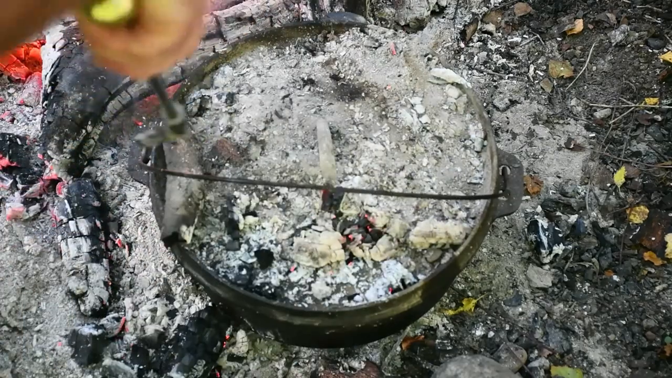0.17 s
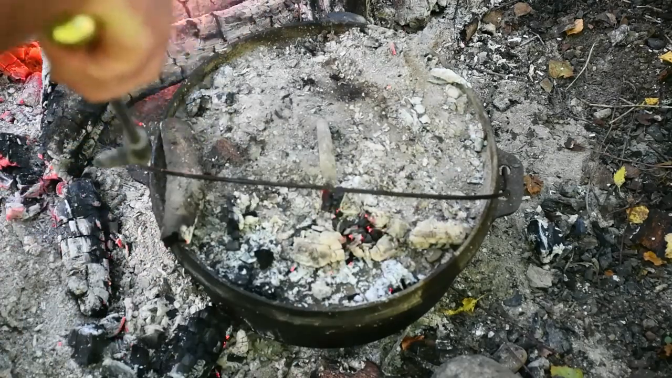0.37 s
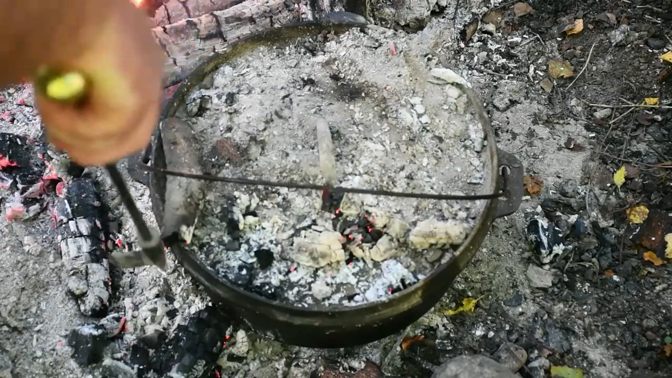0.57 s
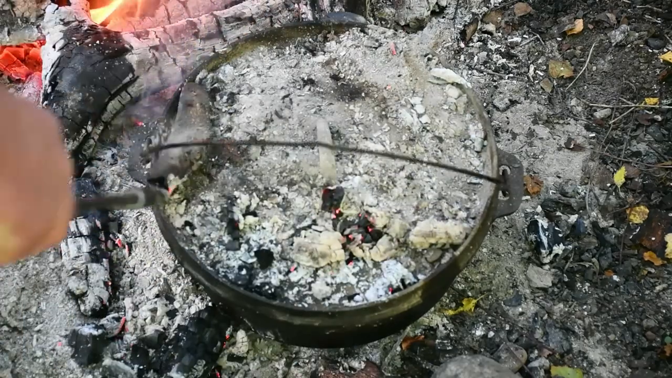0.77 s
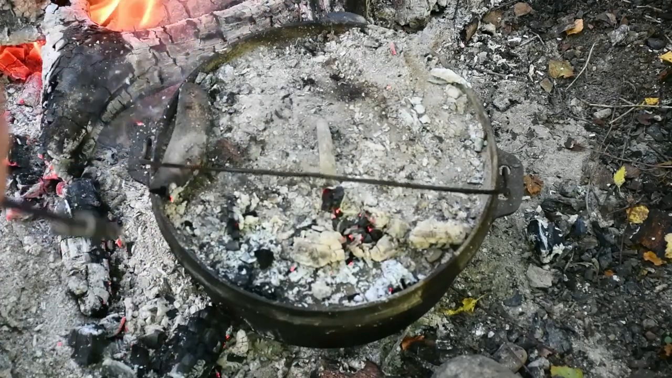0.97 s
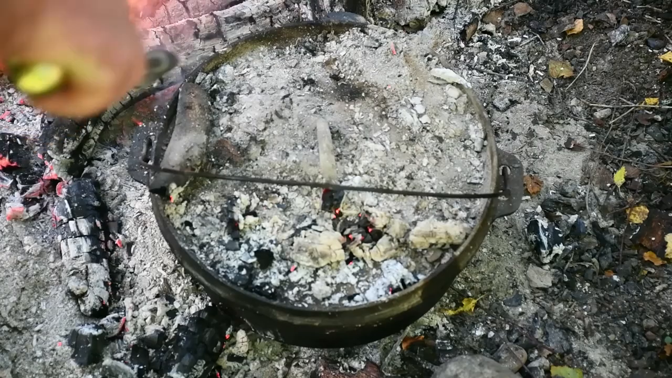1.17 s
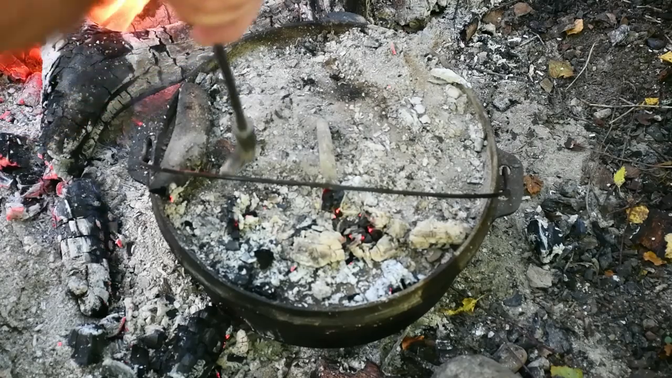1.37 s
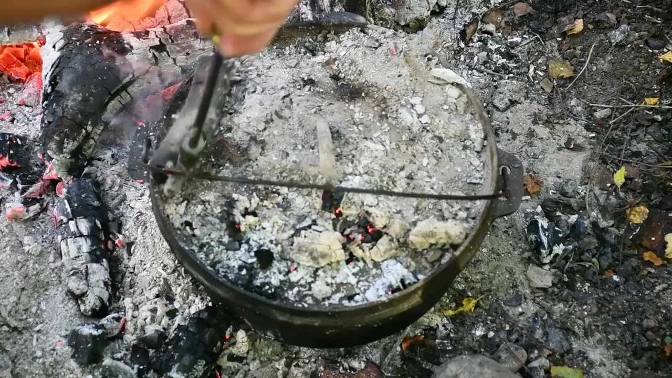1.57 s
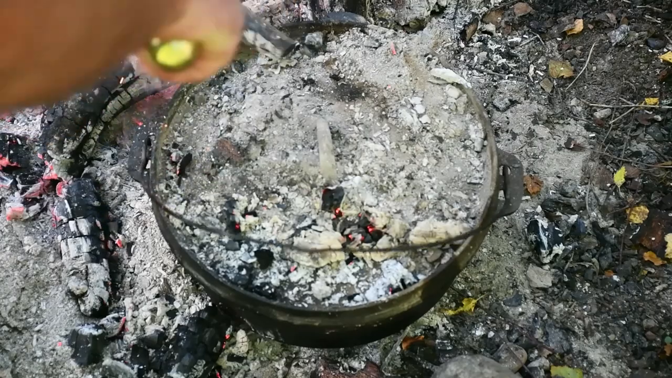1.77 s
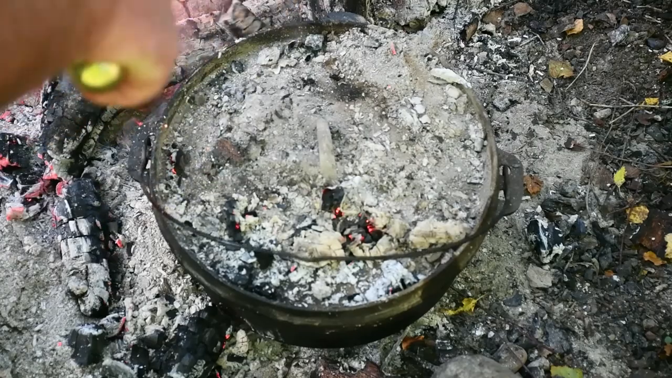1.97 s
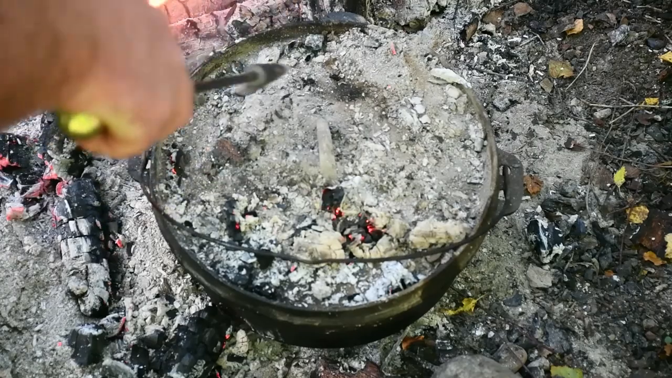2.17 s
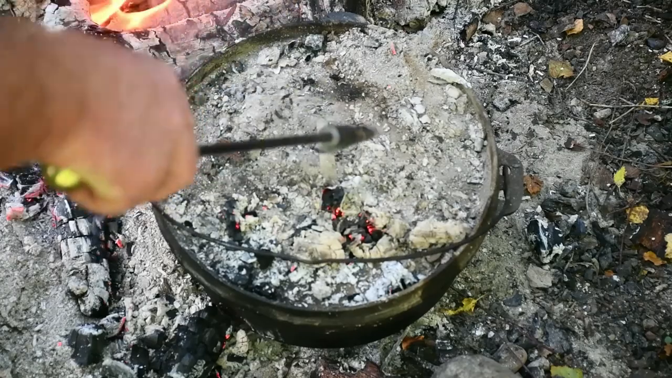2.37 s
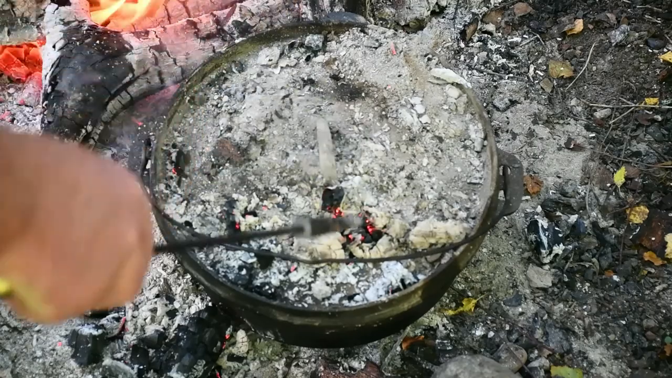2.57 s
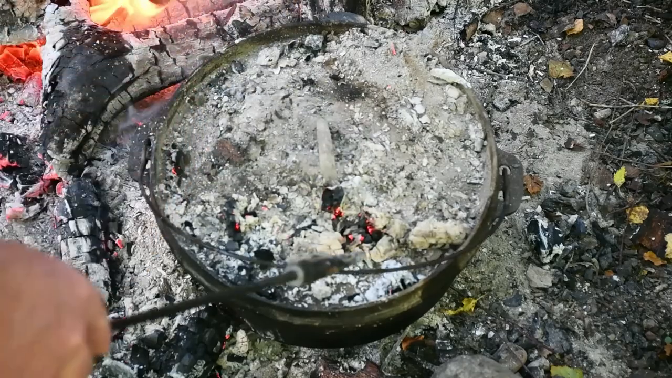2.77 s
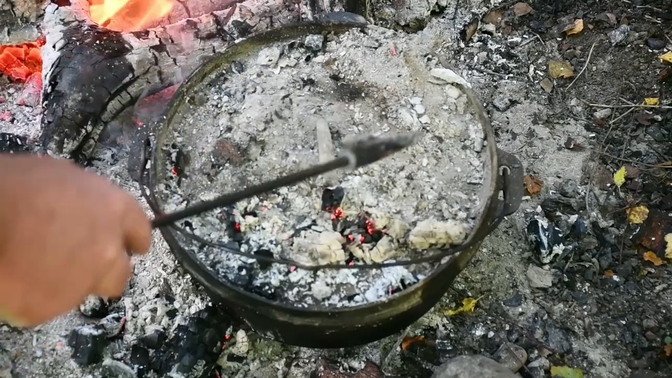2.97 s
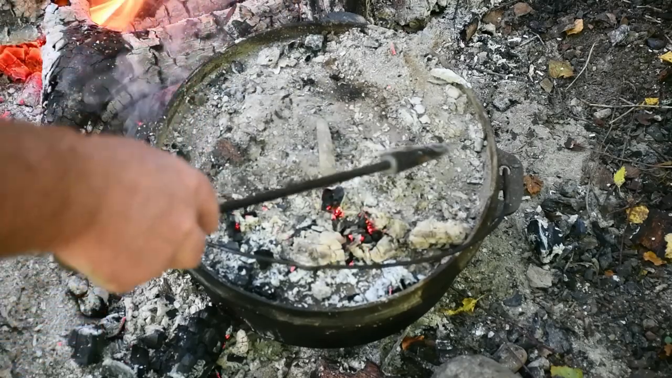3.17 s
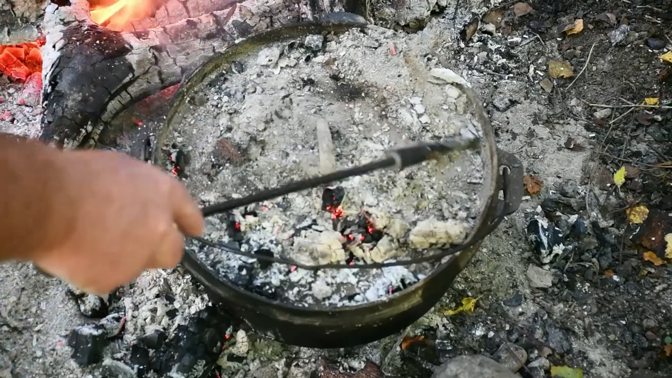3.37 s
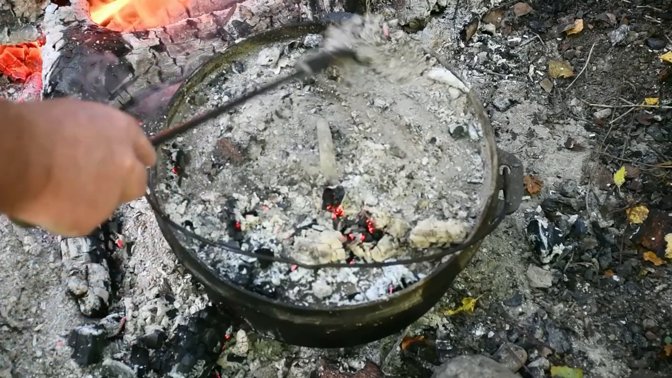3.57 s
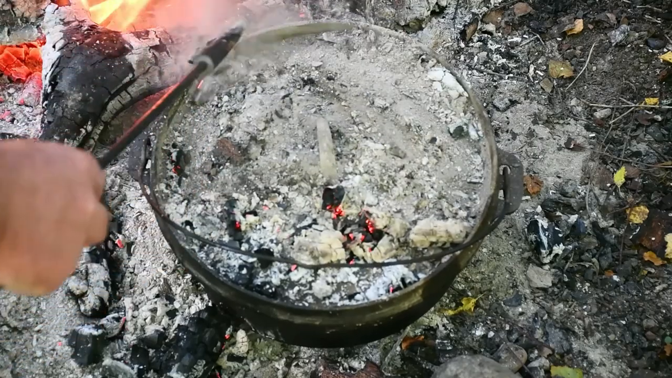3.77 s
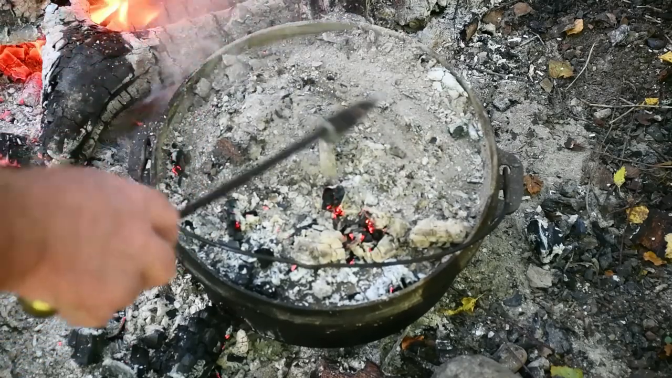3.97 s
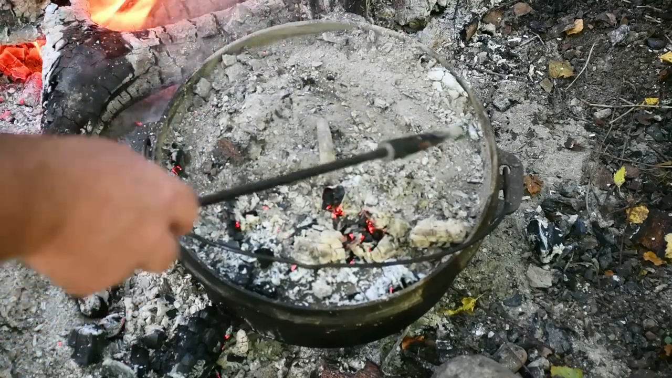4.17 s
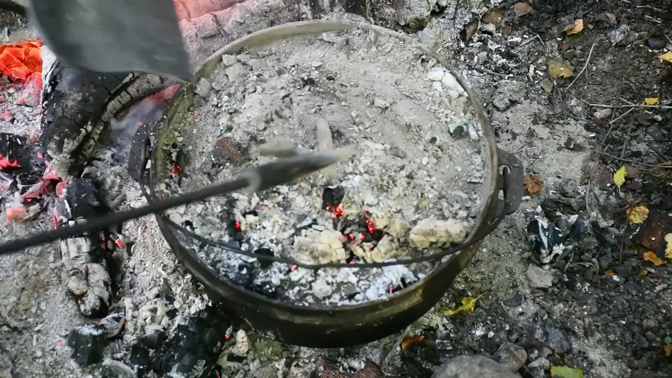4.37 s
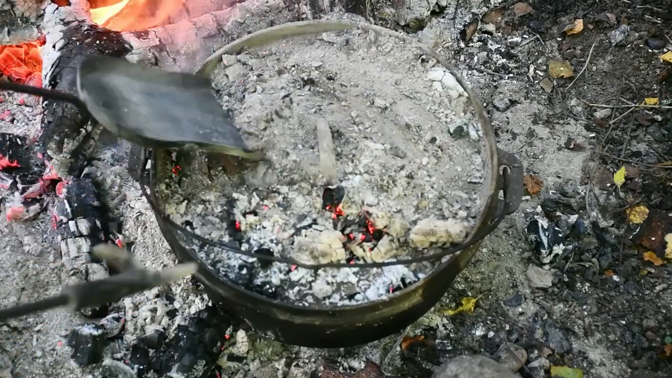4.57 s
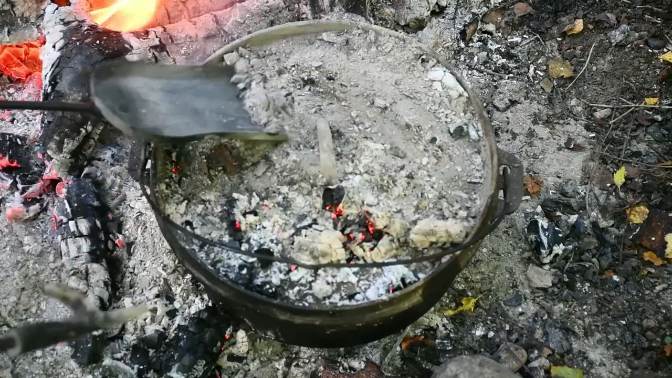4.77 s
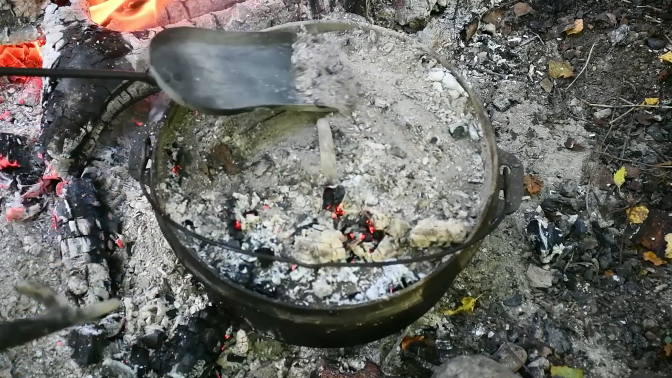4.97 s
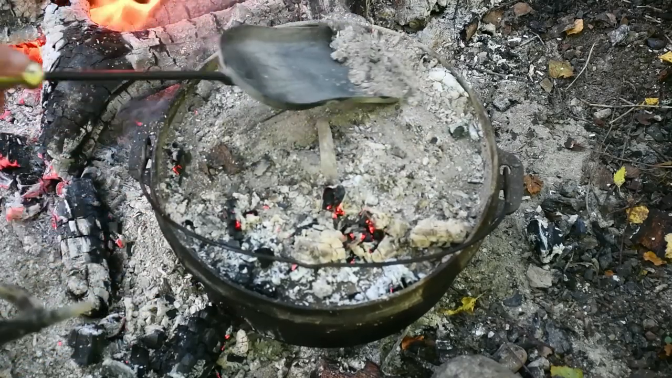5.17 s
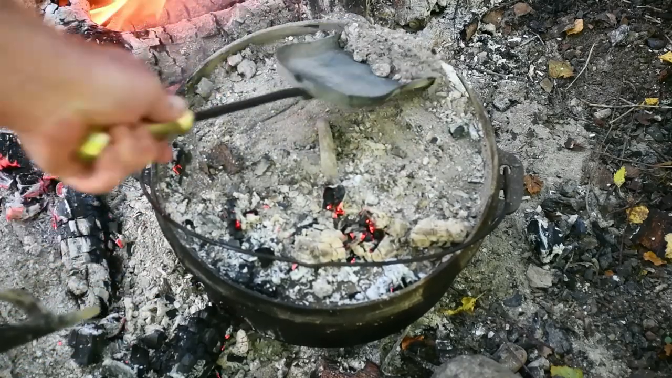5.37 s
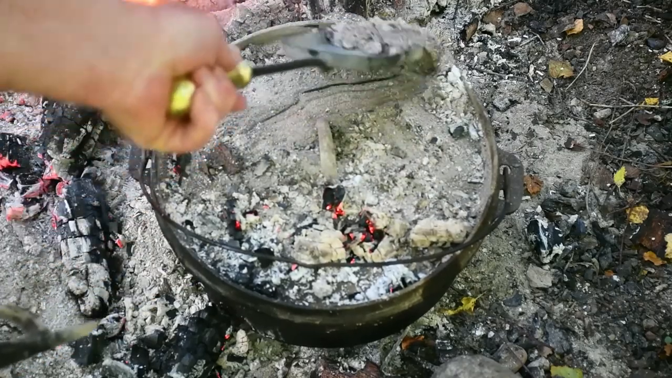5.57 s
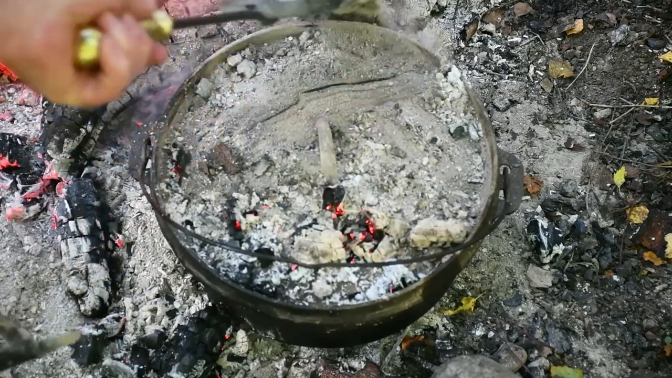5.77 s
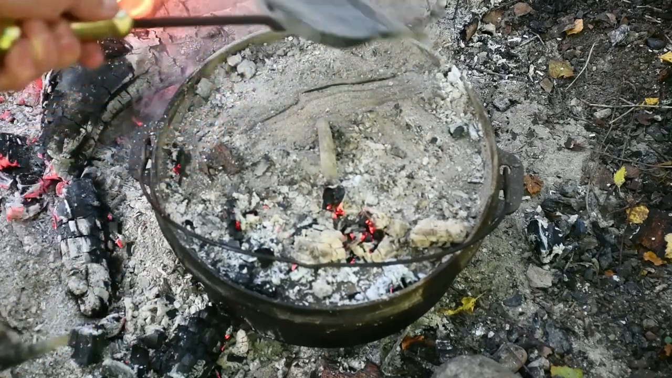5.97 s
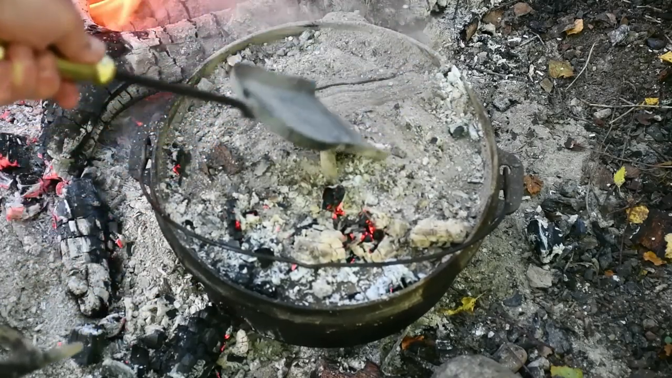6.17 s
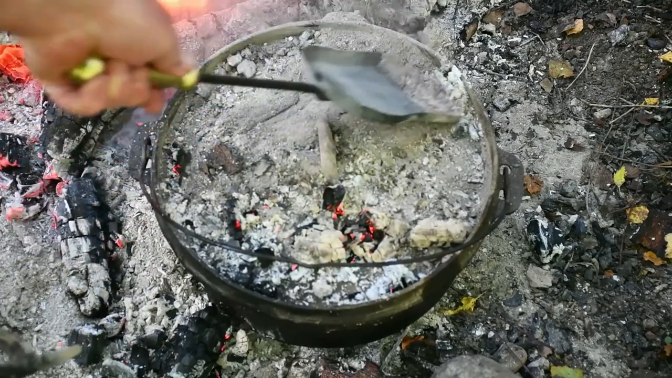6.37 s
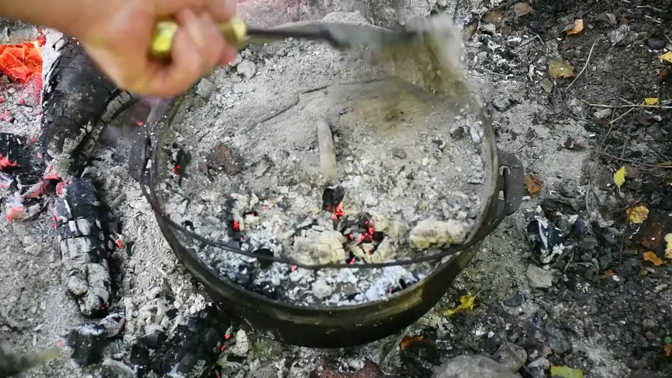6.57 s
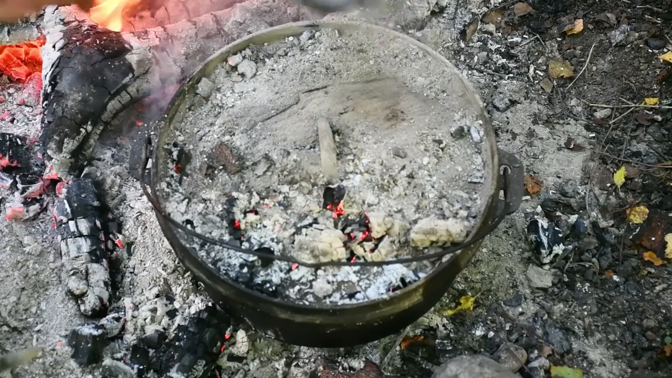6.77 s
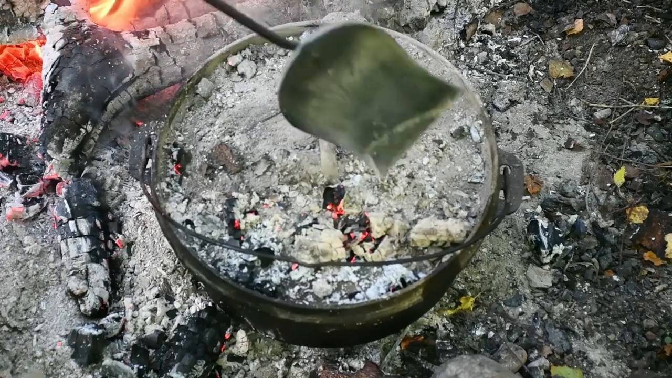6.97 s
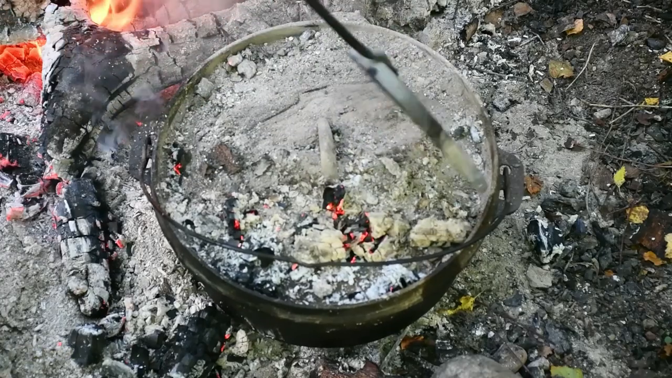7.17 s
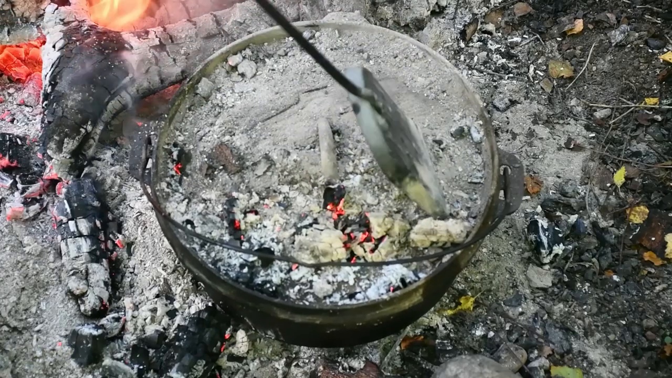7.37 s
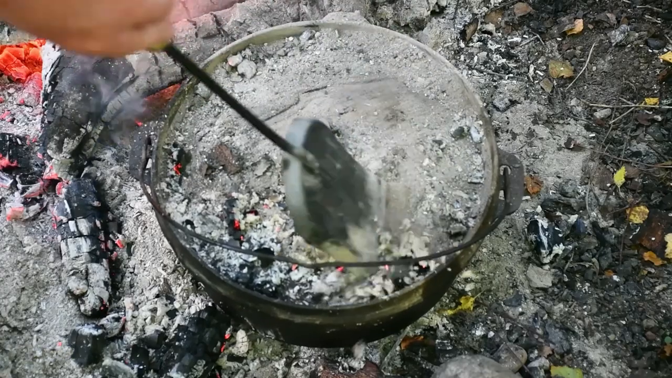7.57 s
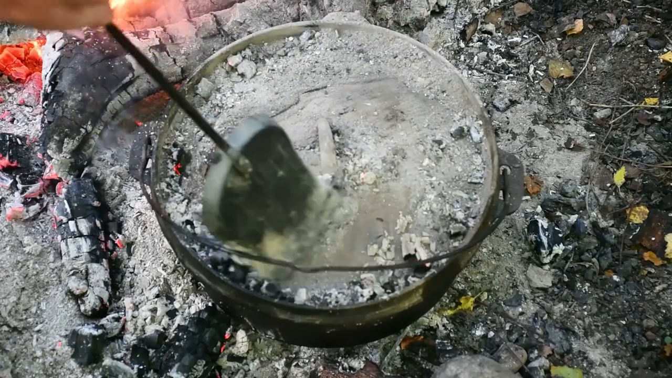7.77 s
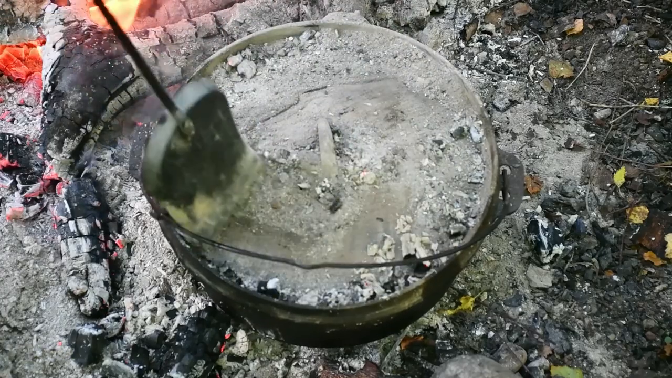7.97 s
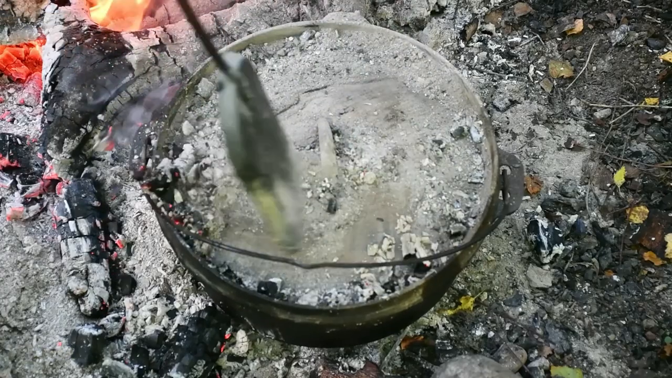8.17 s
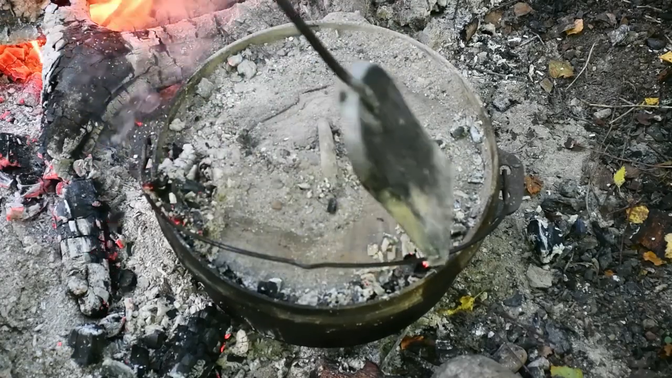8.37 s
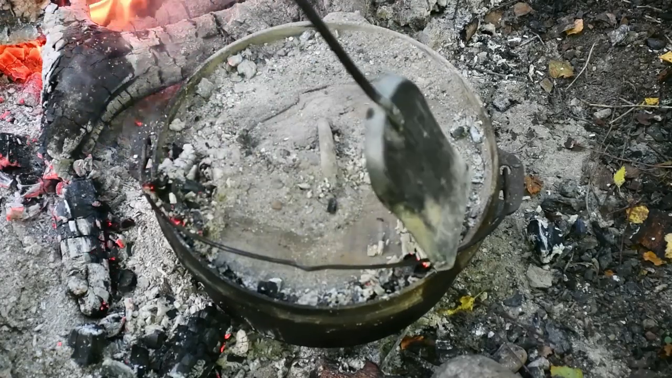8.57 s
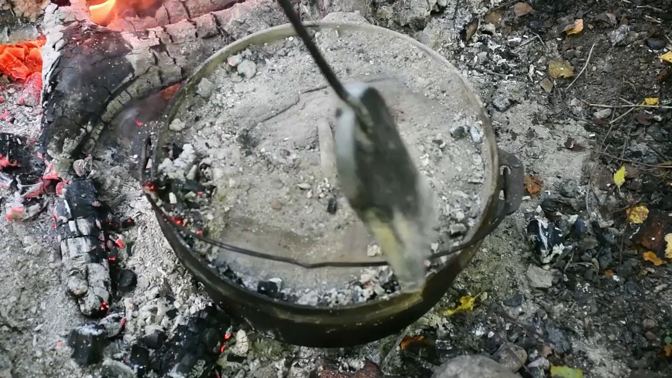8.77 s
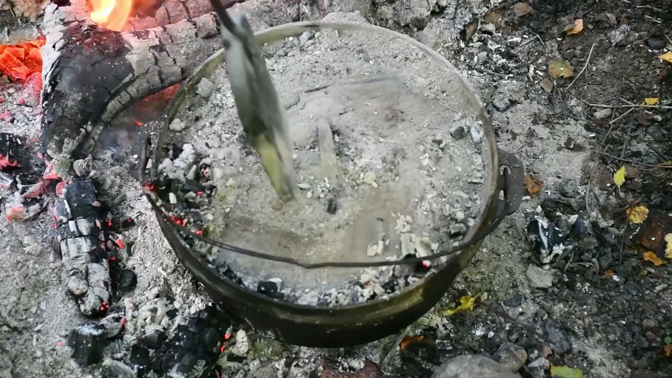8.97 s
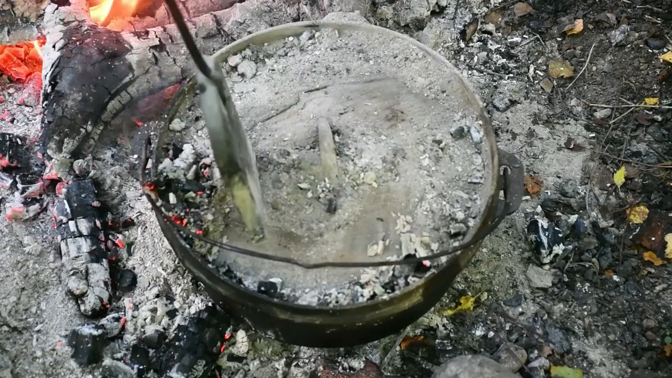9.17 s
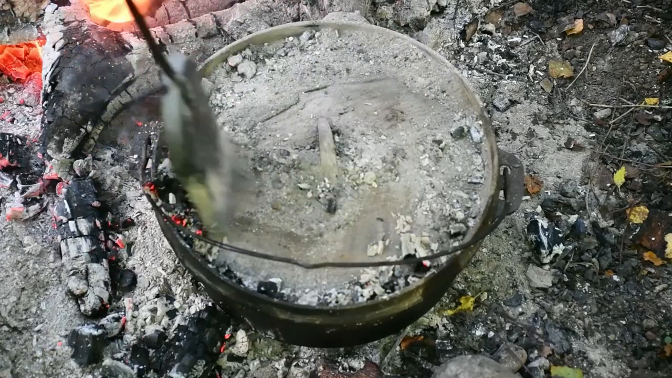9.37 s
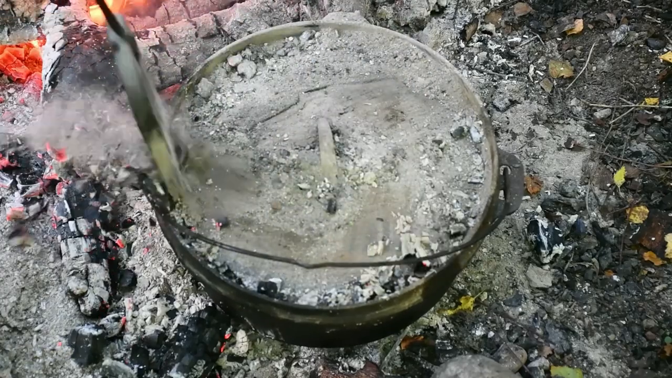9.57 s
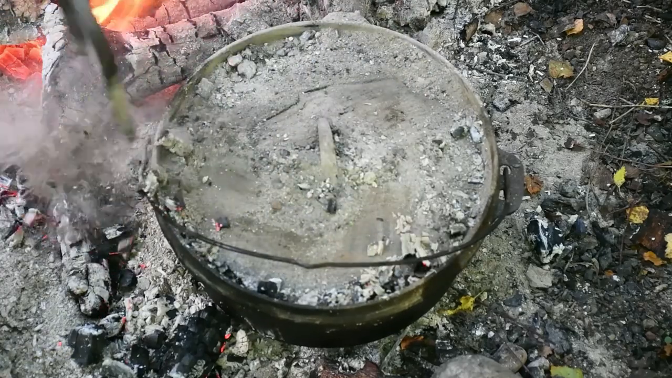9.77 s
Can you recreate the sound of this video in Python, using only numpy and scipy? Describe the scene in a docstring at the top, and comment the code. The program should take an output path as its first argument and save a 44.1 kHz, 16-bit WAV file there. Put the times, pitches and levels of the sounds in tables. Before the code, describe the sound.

Iron on iron, dry and near, in open air with no room echo. Sparse poker knocks and loose-ash drags come first, then a burst of shovel scraping, strongest in the middle and later part, with short damped rings from lid and blade. Between strokes, tiny crackles and hard snaps of embers stand out over quiet distant traffic. Near the end come high fizzes, a few hollow knocks, a short scrape and one loud pop.

```python
"""Fireside iron

An iron poker, then a small ash shovel, knock and scrape on the ash-covered lid of a cast-iron pot.
Grain noise, driven by the force of the tool, hisses directly and excites the modes of lid and tool.
The fire beside it pops (damped snaps) and crackles (sparse random snaps); narrow high hisses fizz
(resonant noise). Far traffic washes behind (coloured noise), an engine drones faintly (two sines),
and a light breeze rumbles (low noise)."""
import sys
import numpy as np
from scipy import signal
from scipy.fft import rfft, irfft
from scipy.io import wavfile
from scipy.ndimage import uniform_filter1d

SR = 44100
rng = np.random.default_rng(int(sys.argv[2]) if len(sys.argv) > 2 else 0)


def linear_from_db(decibels):
    """Turn decibels (scalar or array-like) into linear amplitude factors; 0 gives 1."""
    return 10 ** (np.asarray(decibels, float) / 20)


def master_out(mix):
    """Clip the mix to full scale and print it as 16-bit PCM to the path in sys.argv[1]."""
    frames = np.transpose(np.atleast_2d(mix))
    ceiling = np.clip(frames, -1, 1)
    pcm = np.round(ceiling * 32767).astype(np.int16)
    wavfile.write(sys.argv[1], SR, pcm)


N = 433503


def curve(rows, t):
    """Linear interpolation: joins (seconds, value) rows by straight lines."""
    s, value = np.transpose(rows)
    return np.interp(t, s, value)


def along_hz(points):
    """Logarithmic frequency scale: reads (Hz, value) points at every bin of a full-length spectrum."""
    f, value = np.transpose(points)
    return np.interp(np.log(np.fft.rfftfreq(N, 1 / SR) + 1), np.log(f + 1), value)


def colour(x, points):
    """Spectral shaping: filters x by (Hz, dB) points and returns it at rms 1."""
    y = irfft(rfft(x) * linear_from_db(along_hz(points)), N)
    return y / np.sqrt(np.mean(y ** 2))


def pair(a, b, same):
    """Interaural coherence: left is a; right shares a by the likeness curve and is b for the rest."""
    c = np.clip(along_hz(same), -1, 1)
    return np.array([a, irfft(c * rfft(a) + np.sqrt(1 - c ** 2) * rfft(b), N)])


def resonate(x, hz, width):
    """Resonance: one complex pole of peak gain 1 and the given width in Hz."""
    r = np.exp(-np.pi * width / SR)
    return signal.lfilter([1 - r], [1, -r * np.exp(2j * np.pi * hz / SR)], x)


def burst(length, rise, t60):
    """Exponential decay: a soft rise into a fall of 60 dB per t60."""
    t = np.arange(length) / SR
    return (1 - np.exp(-(t / max(rise, 1e-4)) ** 2)) * linear_from_db(-60 * t / max(t60, .004))


def lumps(length, depth_db):
    """Random modulation: a gain of rms 1 that wanders over about length seconds."""
    slow = signal.oaconvolve(rng.standard_normal(N), np.hanning(max(round(length * SR), 9)), "same")
    gain = linear_from_db(depth_db * slow / slow.std())
    return gain / np.sqrt(np.mean(gain ** 2))


def add(mix, s, sound):
    """Superposition: mixes sound into mix from s seconds."""
    part = mix[..., round(s * SR):][..., :sound.shape[-1]]
    part += sound[..., :part.shape[-1]]


# Spectrum of the wash. Each row: frequency in Hz, relative density in dB per Hz.
WASH_SPECTRUM = [(15, -21), (25, -53), (64, -8), (190, -7.5), (223, -12), (256, -15), (714, -2.5),
                 (1020, 6), (2610, -15.5), (8360, -20.5), (16000, -32)]
# Likeness of left and right. Each row: frequency in Hz, coherence from 0 to 1.
WASH_COHERENCE = [(60, 1), (240, 0.74), (950, 0.14), (3770, 0.0043), (15000, 0.036)]
# Level of the traffic band. Each row: time in seconds, level in dB.
TRAFFIC_LEVEL = [(0, -45.5), (2, -50), (6, -54.5), (9.83, -48)]


def wash():
    """Diffuse broadband noise: fire roar stays steady while the traffic band swells and sinks."""
    t = np.arange(N) / SR
    lean = linear_from_db(np.array([[.7], [-.7]]))  # slightly louder on the left
    noise = colour(pair(*rng.standard_normal((2, N)), WASH_COHERENCE), WASH_SPECTRUM) * lean
    traffic_band = signal.butter(1, [400, 2500], "bandpass", fs=SR, output="sos")
    road = signal.sosfilt(traffic_band, noise)
    steady = linear_from_db(-39.0) * (noise - road)
    return steady + linear_from_db(curve(TRAFFIC_LEVEL, t)) * road / road.std()


# Level of the engine. Each row: time in seconds, level of the lower partial in dB.
DRONE_LEVEL = [(1.3, -62), (2.5, -56.5), (5.8, -56.5), (6.8, -84)]


def drone():
    """Harmonic series: the second and third orders of a far engine whose speed wavers a little."""
    t = np.arange(N) / SR
    order_hz = 115.2
    waver = 0.26 * uniform_filter1d(rng.standard_normal(N), size=20000)
    turns = np.cumsum(order_hz * (1 + waver)) / SR
    orders = np.sin(4 * np.pi * turns) + linear_from_db(-9.5) * np.sin(6 * np.pi * turns)
    return linear_from_db(curve(DRONE_LEVEL, t)) * orders


def breeze():
    """Turbulence: lumpy low rumble of moving air, partly shared by left and right."""
    gusts = linear_from_db(uniform_filter1d(rng.standard_normal((2, N)), size=6000) * 78)
    noise = rng.standard_normal((2, N)) + 1.3 * rng.standard_normal(N)
    low_band = signal.butter(2, [45, 90], "bandpass", fs=SR, output="sos")
    rumble = signal.sosfilt(low_band, noise)
    return linear_from_db(np.array([[-58], [-63]])) * gusts * rumble / rumble.std()


def pop(hz, chance, rise=0.56):
    """Impulse and scattering: a sharp snap of a few cycles, then a dusty scatter of echoes."""
    t = np.arange(len(chance)) / SR
    cycles = t * hz / max(rise, .2)
    snap = np.e * cycles * np.exp(-cycles) * np.sin(2 * np.pi * hz * t)
    echoes = linear_from_db(-31) * chance.T * burst(len(chance), rise=.0005, t60=.07)
    return snap + signal.lfilter(snap[:40], 1, echoes)


def crackle():
    """Poisson process: small snaps at random instants, about 5 a second at each of four pitches."""
    out = np.zeros((2, N))
    for hz in (5230, 7000, 8900, 11600):
        level_db = -32.5 + 3.3 * np.minimum(rng.exponential(1, N), 3)
        snaps = linear_from_db(level_db) * (rng.random(N) < 5 / SR)
        side = linear_from_db(rng.normal(0, 1.8, N) * np.array([[.5], [-.5]]))
        out += signal.oaconvolve(snaps * side, pop(hz, rng.standard_normal((1000, 2))), axes=1)[:, :N]
    return out


# Narrow high hisses. Each row: start in seconds, level in dB, t60 in seconds, centre in Hz,
# width of each resonance in Hz.
HISSES = [(0.061, -49.5, 0.67, 8270, 400), (3.017, -38.5, 0.35, 8640, 710), (8.706, -19, 0.54, 7040, 1090),
          (8.706, -20, 0.48, 8570, 890), (9.515, -19.5, 0.36, 8320, 950)]


def fizz():
    """Cascaded resonance: noise narrowed by three equal resonances in a row, swelling and dying away."""
    out = np.zeros((2, N))
    chance = rng.standard_normal((len(HISSES), 2, SR // 2))
    for (s, db, t60, hz, width), c in zip(HISSES, chance):
        hiss = c + .5 * c[::-1]  # left and right leak into each other
        for _ in range(3):
            hiss = resonate(hiss, hz, width)
        hiss = hiss.real
        add(out, s, linear_from_db(db) * hiss / hiss.std() * burst(SR // 2, .029, t60))
    return out


# Long strokes. Each row: colour as thud of the pot, ring of the lid and bright dust in dB against the grit,
# then the pressure as points of time in seconds and level in dB.
SCRAPES = [ ((-6.5, -10.5, 0), [(3.35, -57), (3.39, -31.5), (3.47, -31), (3.56, -36.5)]),
           ((-11, -10.5, 0.87), [(3.62, -30.5), (3.69, -29), (3.72, -43), (3.86, -48.5)]), ((-11, -8, -1.2),
           [(4.53, -53), (4.57, -38), (4.64, -40.5), (4.75, -33), (4.84, -27), (4.97, -34.5), (5.01, -30),
           (5.06, -34), (5.11, -24), (5.16, -33.5), (5.36, -40.5)]), ((-2.3, -2.5, 1), [(5.42, -37),
           (5.5, -46), (5.54, -32.5), (5.58, -40), (5.67, -55)]), ((-10, 2.4, 5.7), [(6.23, -43),
           (6.262, -33.5), (6.281, -26), (6.29, -21.5), (6.42, -22.5), (6.46, -79)]), ((-30, 0.85, 0.34),
           [(6.5, -31.5), (6.54, -19.5), (6.59, -41.5), (6.66, -49)]), ((-15.5, -7, 4.4), [(7.415, -30.5),
           (7.44, -22), (7.48, -20), (7.525, -22), (7.55, -27.5), (7.57, -22.5), (7.595, -29.5),
           (7.62, -20), (7.72, -33)]), ((-3.5, -8, 0.58), [(7.72, -31), (7.77, -24), (7.83, -30.5),
           (7.87, -28), (7.89, -19.5), (7.94, -25.5), (7.97, -36), (8.1, -46)]), ((-0.19, -8, 7),
           [(9.33, -33.5), (9.345, -23), (9.41, -23), (9.45, -64), (9.475, -38)]), ]
# Light drags through loose ash. Each row: start in seconds, length in seconds, pressure level in dB,
# change over the length in dB, dust against the grit in dB.
ASH_DRAGS = [(0.658, 0.17, -32, -12.5, -3), (1.471, 0.14, -36, -13, 4), (1.548, 0.5, -40, -9.5, -0.5),
             (2.714, 0.11, -37, -11, 4), (6.723, 0.12, -34.5, -18, -8), (6.802, 0.34, -48, -5.5, 4),
             (8.576, 0.17, -36.5, -17.5, -3), (9.199, 0.13, -47.5, 5, 2.5), (9.488, 0.16, -36, -6, 3.5),
             (9.703, 0.15, -31.5, -31, 9)]
# Blows. Each row: time in seconds, grit level in dB, thud and ring against it in dB,
# t60 of the crunch in seconds, favoured note in Hz.
BLOWS = [(0.627, -9.5, -34, -1.5, 0.11, 1840), (1.456, -20.5, -10.5, -35, 0.12, 2900),
         (1.498, -32, 4, -8, 0.15, 600), (1.936, -30, 6, -15, 0.044, 398),
         (1.9984, -28.5, -4, -32, 0.054, 990), (2.6178, -11, -10.5, -35, 0.066, 3060),
         (2.678, -18, -6, -27, 0.05, 2760), (2.837, -27.5, -14, -30, 0.088, 2560),
         (3.236, -25.5, -0.5, -3, 0.15, 195), (3.358, -27, 3.5, -3, 0.063, 790),
         (3.583, -15, -21, 1.5, 0.21, 1920), (4.858, -10, -9.5, 3, 0.095, 1130),
         (5.001, -25.5, -29, 4.5, 0.064, 1660), (5.0972, -12, -39, -1.5, 0.09, 2080),
         (5.413, -22.5, 2.5, -29, 0.032, 1460), (5.598, -23, -34, 7, 0.14, 1920),
         (6.187, -28, -2.5, -7, 0.12, 1000), (6.4249, -16, 6, 5.5, 0.057, 920),
         (6.5128, -10.5, -26, -28, 0.13, 1950), (7.3018, -13.5, -18, -10, 0.18, 2670),
         (7.33, -20, 7.5, 4, 0.056, 810), (7.343, -41, 21, 0, 0.081, 212),
         (7.349, -39, 0, 21.5, 0.076, 2070), (7.432, -24.5, 5, -10, 0.029, 175),
         (7.514, -39, 10, -7, 0.031, 200), (7.8, -25, 4, 14, 0.045, 230),
         (7.846, -11.5, -22, -2, 0.039, 840), (8.53, -7.5, -28, -17, 0.031, 2700),
         (8.548, -7.5, -18, -17, 0.038, 2300), (9.138, -14, 3, 3, 0.046, 400),
         (9.23, -48.5, 22, 5, 0.081, 270), (9.261, -47.5, 16, 7, 0.065, 250),
         (9.426, -25, 9, 5.5, 0.062, 270)]
# Growth with pressure. The entries: dB that thud, ring, grit and dust gain per dB over a light touch.
PRESSURE_GROWTH = (0.83, 1.25, 1.286, 1.095)


def contact():
    """Contact force: amplitude in thud, ring, grit and dust, on the iron and in loose ash only."""
    light_db, edges_s = -29.5, 0.0048  # edges_s: fade-in and fade-out together
    drag_thud_db, drag_ring_db, knock_dust_db = -20, -8, 1
    power = np.zeros((2, 4, N))
    drags = []
    for s, length, db, fade, dust in ASH_DRAGS:
        drags.append(((drag_thud_db, drag_ring_db, dust), [(s, db), (s + length, db + fade)]))
    for surface, strokes in enumerate((SCRAPES, drags)):
        for (thud, ring, dust), rows in strokes:
            t = np.arange(rows[0][0], rows[-1][0], 1 / SR)
            growth_db = np.outer(PRESSURE_GROWTH, curve(rows, t) - light_db)
            level_db = light_db + growth_db + np.array([[thud], [ring], [0], [dust]])
            edges = signal.windows.tukey(len(t), min(edges_s * SR / len(t), 1))
            add(power[surface], t[0], (linear_from_db(level_db) * edges) ** 2)
    power[1] *= lumps(0.0088, 2.5) ** 2  # clods of ash break one after another
    power[:, 0] *= lumps(0.17, 7) ** 2  # the pot is jolted in bumps
    for s, grit, thud, ring, t60, _ in BLOWS:
        level = linear_from_db(grit + np.array([[thud], [ring], [0], [knock_dust_db]]))
        add(power[0], s - .003, (level * burst(SR // 3, rise=0.0053, t60=t60)) ** 2)
    return np.sqrt(power)


SHOVEL_FROM_S = 4.45  # the poker plays before, the shovel after
# Spectrum of the grains. Each row: frequency in Hz, relative density in dB per Hz.
GRIT_SPECTRUM = [(59, -80), (100, -10.5), (206, -1), (662, 0), (1170, 5), (2930, -1), (7290, -0.5),
                 (9020, 4.5), (12500, -8), (16000, -12.5)]
# Likeness of left and right. Each row: frequency in Hz, coherence from 0 to 1.
GRIT_COHERENCE = [(60, 0.51), (240, 1), (950, 0.83), (3770, 0.64), (15000, 0.057)]
# Edges of the thud, ring, grit and dust bands. The entries: frequency in Hz.
BAND_LOW_HZ = [130, 620, 2800, 7000]
BAND_HIGH_HZ = [500, 2800, 7000, 19000]
# Direct sound past the modes. The entries: level of thud, ring, grit and dust in dB.
DIRECT_DB = (-9, -7, -6, -4)


def crush(on_iron, in_ash):
    """Granular noise: crushed ash gives the force that drives the iron, and a direct hiss."""
    size = linear_from_db(4.75 * np.minimum(rng.exponential(1, (2, N)), 5))
    chatter = linear_from_db(uniform_filter1d(rng.standard_normal(N), size=180) * 20)  # the tip skips every few ms
    noise = pair(*(size * rng.standard_normal((2, N))), GRIT_COHERENCE)
    grains = colour(noise * chatter, GRIT_SPECTRUM)
    force, hiss = np.zeros((2, N)), np.zeros((2, N))
    for k, level in enumerate(on_iron):
        edges = [BAND_LOW_HZ[k], BAND_HIGH_HZ[k]]
        band = signal.sosfilt(signal.butter(2, edges, "bandpass", fs=SR, output="sos"), grains)
        band *= (-1) ** k / np.sqrt(np.mean(band ** 2))
        force += level * band
        hiss += (in_ash[k] + linear_from_db(DIRECT_DB[k]) * level) * band
    # a thick rod grinds duller than a thin blade
    blunt_force = signal.sosfilt(signal.butter(2, 9500, fs=SR, output="sos"), force)
    blunt_hiss = signal.sosfilt(signal.butter(1, 13000, fs=SR, output="sos"), hiss)
    shovel = np.arange(N) / SR > SHOVEL_FROM_S
    return np.where(shovel, force, blunt_force), np.where(shovel, hiss, blunt_hiss)


def crowded_modes(count, t60):
    """Modal density: many weak upper modes of thin iron, each at its own phase left and right."""
    hz, size, turn = rng.random((count, 3)).T
    t = np.arange(6000)[:, None] / SR
    phase = 2 * np.pi * (3600 + 12000 * hz) * t + (turn - .5) * np.array([[[-2.6]], [[2.6]]])
    ring = (size * np.sin(phase)).sum(2) * burst(len(t), rise=0, t60=t60)
    return ring / np.linalg.norm(ring[0])


def shimmer(push):
    """Crossfaded modal sets: three sets of upper modes fade into one another at a steady rate."""
    t = np.arange(N) / SR
    out = np.zeros((2, N))
    for k in range(3):
        share = np.cos(2 * np.pi * (2.3 * t + k / 3)) ** 2
        upper = signal.oaconvolve((share * push)[None], crowded_modes(count=90, t60=0.11), axes=1)
        out += linear_from_db(-12.5) * upper[:, :N]
    return out


def favour(hz, note_hz):
    """Modal participation: modes near the note of the touched spot ring loudest."""
    return linear_from_db(12.15 * np.exp(-(np.log(hz / note_hz) / 0.26) ** 2) - 9.5)


# Modes of the lid, the poker and the shovel. Each row: frequency in Hz before loading,
# relative level in dB, t60 in seconds when free.
LID_MODES = [(165, 12, .12), (212, 19, .17), (260, 10, .1), (335, 6, .035), (540, 3, .05), (715, 4, .1),
             (829, 14, .07), (1192, 21, .13), (1525, 18, .13), (2021, 20, .15), (2326, 15, .12),
             (2446, 13, .16), (2642, 17, .1)]
POKER_MODES = [(4150, 12, .08), (5308, 12, .12), (6228, 13, .1), (6920, 14, .08), (7100, 17, .1),
               (7373, 28, .11), (8578, 19, .07)]
SHOVEL_MODES = [(3300, 7, .08), (3700, 11, .08), (4150, 16, .09), (4373, 15, .12), (4450, 16, .07),
                (5060, 16, .13), (5980, 14, .1), (7870, 18, .07), (8737, 17, .09), (8977, 16, .09),
                (10180, 13, .07)]
# Note of the lid favoured as a scrape moves across it. Each row: time in seconds, frequency in Hz.
LID_SPOTS = [(3.47, 2220), (3.64, 2200), (6.29, 1150), (6.4, 1000), (6.54, 1930), (7.36, 2020),
             (7.461, 2680), (7.66, 2950), (7.9, 2850), (9.34, 387), (9.38, 1220)]
# Note of the tool favoured as it tilts. Each row: time in seconds, frequency in Hz.
TOOL_TILTS = [(3.39, 6060), (3.5, 8450), (3.6, 7200), (4.58, 3470), (4.87, 4600), (5.1, 4750), (6.3, 6940),
              (7.47, 4500), (7.62, 6850)]
# First touch of iron on iron. The entries: gain over the crunch of thud, ring, grit and dust in dB.
FIRST_TOUCH_DB = (45.9, 45.3, 45.4, 41.2)


def ring_iron(push, on_iron):
    """Modal synthesis: rubbing drives each mode of lid and tool, and blows add free decays."""
    blow_rise_s = 0.0038
    dead_crunch_s, dead_share = .06, 0.65  # blows with a shorter crunch stay pressed and choke the ring
    lid_share, lid_press_db = 0.48, -4  # ring time and level left to the lid while the tool presses on it
    load_hz = 8.8  # rms pull on every mode by ash and tool resting on the iron
    hop = 256  # samples per step of the slow movements
    t = np.arange(N) / SR
    slow_t = t[::hop]
    shovel = t > SHOVEL_FROM_S
    blow_s, crunch_s, note_hz = np.transpose(BLOWS)[[0, 4, 5]]
    blow_at = ((blow_s + .003) * SR).astype(int)
    strike = linear_from_db(np.array(FIRST_TOUCH_DB))[:, None] * on_iron
    lid_notes = curve(sorted([*zip(blow_s, note_hz), *LID_SPOTS]), slow_t), note_hz
    tool_notes = curve(TOOL_TILTS, slow_t), curve(TOOL_TILTS, blow_s)
    after = np.arange(SR // 5)
    out = np.zeros((2, N))
    bodies = (
        (LID_MODES, linear_from_db(-6.0), lid_notes, lid_share, lid_press_db),
        (POKER_MODES, linear_from_db(-11.5) * ~shovel, tool_notes, 1, 0),
        (SHOVEL_MODES, linear_from_db(-4.0) * shovel, tool_notes, 1, 0),
    )
    for modes, held, (rubbed_hz, struck_hz), share, press_db in bodies:
        for hz, db, t60 in modes:
            drift_db = uniform_filter1d(rng.standard_normal(len(slow_t)), size=14) * 22
            drift_db = np.minimum(drift_db, 4)  # the contact wanders over the nodes
            slow_gains = [favour(hz, rubbed_hz), linear_from_db(drift_db)]
            reach, wander = np.repeat(slow_gains, hop, axis=1)[:, :N]
            pull = load_hz * uniform_filter1d(rng.standard_normal(len(slow_t)), size=49) * np.sqrt(49)
            bend = np.exp(2j * np.pi * np.cumsum(np.repeat(pull, hop)[:N]) / SR)
            # the mode rings at a fixed pitch; unbending its drive and bending its output moves the pitch
            grip = held / bend
            width = np.log(1000) / np.pi / max(t60, .02)
            ring = resonate(push * wander * linear_from_db(press_db) * reach * grip, hz, width / share)
            tone = np.exp(2j * np.pi * hz * after / SR)
            free = burst(len(after), blow_rise_s, t60) * tone
            dead = burst(len(after), blow_rise_s, t60 * dead_share) * tone
            hit = strike[np.searchsorted(BAND_LOW_HZ, hz) - 1]
            aims = favour(hz, struck_hz) * grip[blow_at]
            for at, length, aim in zip(blow_at, crunch_s, aims):
                decay = dead if length < dead_crunch_s else free
                add(ring, at / SR, np.pi * width / SR * hit[at] * aim * decay)
            # each mode radiates its own way
            turn = np.exp(1j * np.array([[-1], [1]]) * rng.normal(0, hz / 4500))
            out += linear_from_db(db) * (ring * bend * turn).real
    return out


# Stereo balance of the iron. Each row: frequency in Hz, left minus right in dB.
IRON_BALANCE = [(60, -3), (380, -1), (2380, 0), (8500, -1), (15000, -4.5)]


def iron():
    """Source and resonator: crushed grains hiss directly and ring the lid and the tool."""
    on_iron, in_ash = contact()
    force, hiss = crush(on_iron, in_ash)
    push = force.sum(0)
    out = hiss + shimmer(push) + ring_iron(push, on_iron)
    tilt = linear_from_db(along_hz(IRON_BALANCE) * np.array([[.5], [-.5]]))
    return irfft(rfft(out) * tilt, N)


# Bursting embers. Each row: time in seconds, relative level in dB, centre in Hz, left minus right in dB,
# rise in cycles (0.2 at the least).
EMBERS = [(0.714, -20, 5900, 4, 1.3), (1.5017, -14, 8360, 2, 0.61), (1.939, -6.5, 7200, -1, 0.38),
          (2.4416, -16, 6700, 2, 0.71), (2.5114, -23.5, 8600, -1.0, 0.35),
          (2.7707, -10.5, 5360, -0.5, 0.34), (2.7944, -25, 5300, 2, 0.73), (3.5327, -5, 8000, -8, 1.2),
          (4.3207, 3.5, 6800, -1.5, 0.25), (5.3743, -13.5, 8700, -2, 0.17), (5.9618, -19, 5100, -1, 0.21),
          (6.1997, -6, 8350, -3, 0.3), (6.26, -2, 8600, -1.5, 0.46), (6.517, 3, 7000, 3, 0.17),
          (7.0743, -22.5, 10200, 2, 0.49), (7.116, -24.5, 8900, -7, 0.34), (7.2554, -28, 8820, 7, 1.1),
          (7.8461, 4, 6370, -3, 0.39), (9.2616, -17.5, 8740, -3.0, 0.73), (9.6881, 10.5, 8450, -1, 0.54)]


def pops():
    """Impulsive release: each bursting ember gives one loud snap."""
    out = np.zeros((2, N))
    chance = rng.standard_normal((len(EMBERS), 2000, 2))
    for (s, db, hz, pan, rise), c in zip(EMBERS, chance):
        gain = linear_from_db(db + 5.5 + pan * np.array([[.5], [-.5]]))
        add(out, s, gain * pop(hz, c, rise))
    return out


def scene():
    """Superposition: iron in front, fire beside it, traffic and engine far off."""
    background = wash() + drone() + breeze()
    snaps = crackle() + pops()
    return background + snaps + fizz() + iron()


def low_pass(x):
    """Removes everything above the highest recorded frequency."""
    return signal.sosfilt(signal.butter(12, 15900, fs=SR, output="sos"), x)


def record(dry):
    """Soft saturation: the loudest peaks bend over towards full scale."""
    mix = np.tanh(dry * 1.156) / 0.89
    return low_pass(mix)


dry = scene()
out = record(dry)
master_out(out)
```